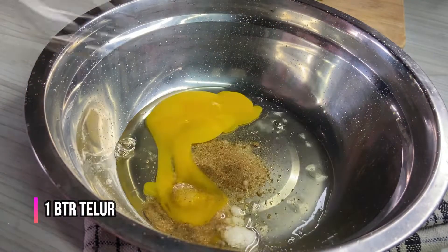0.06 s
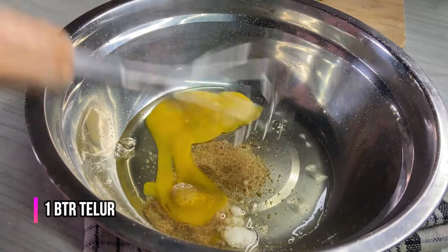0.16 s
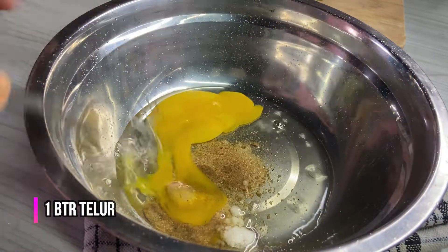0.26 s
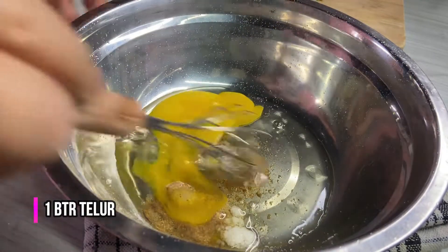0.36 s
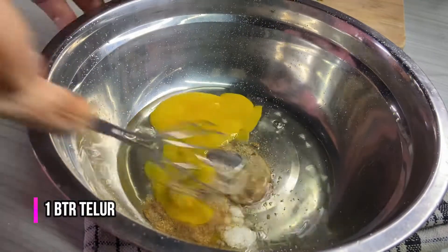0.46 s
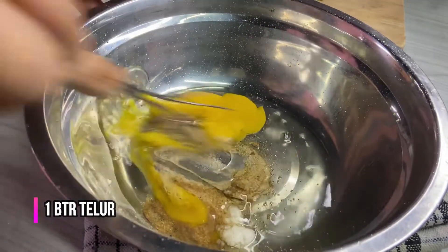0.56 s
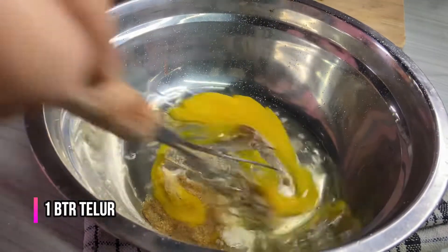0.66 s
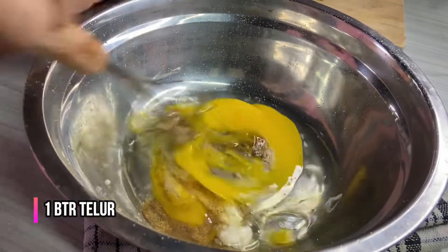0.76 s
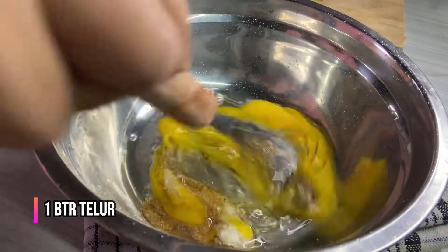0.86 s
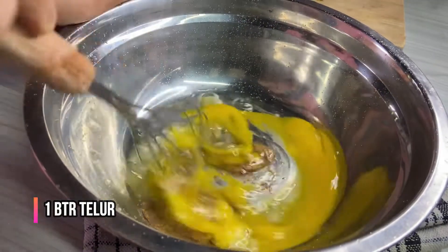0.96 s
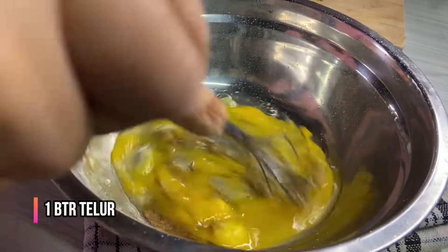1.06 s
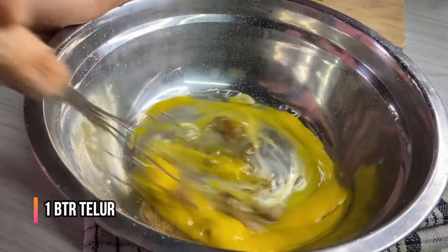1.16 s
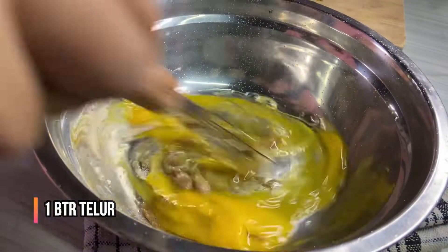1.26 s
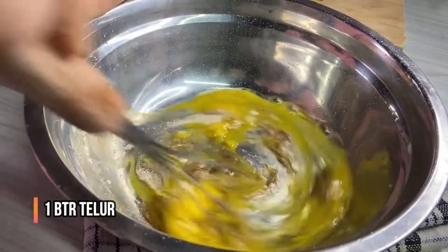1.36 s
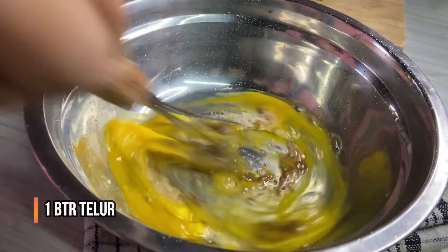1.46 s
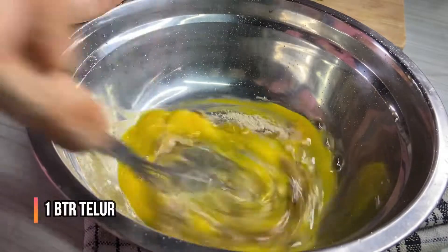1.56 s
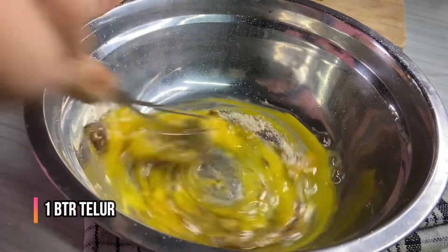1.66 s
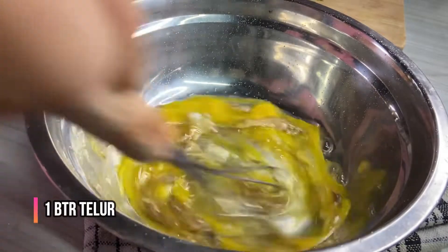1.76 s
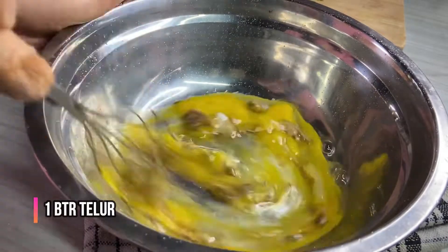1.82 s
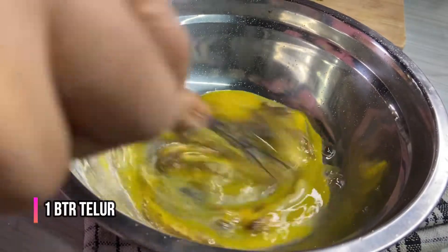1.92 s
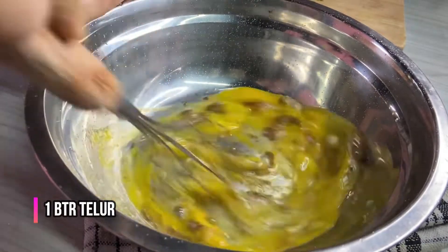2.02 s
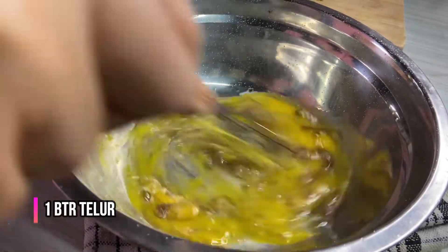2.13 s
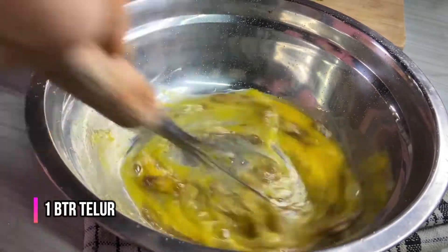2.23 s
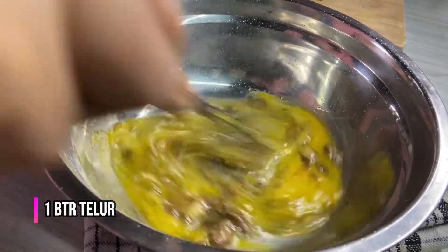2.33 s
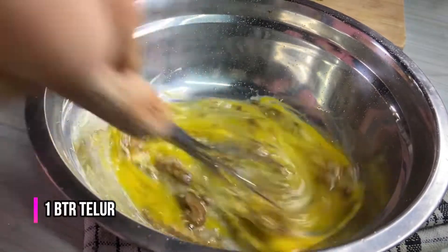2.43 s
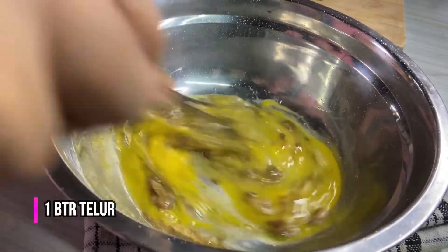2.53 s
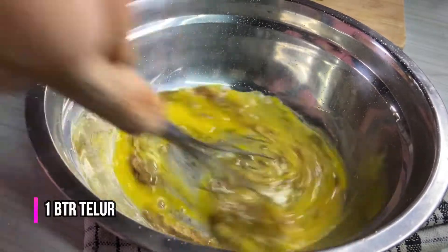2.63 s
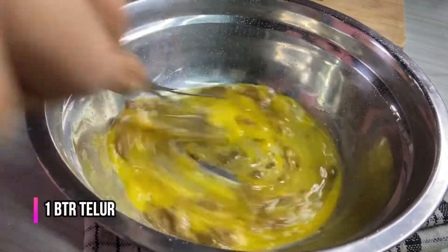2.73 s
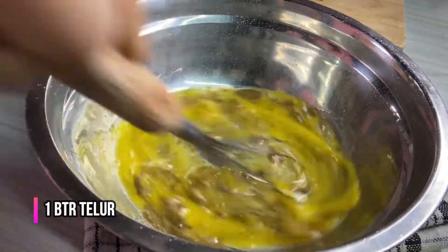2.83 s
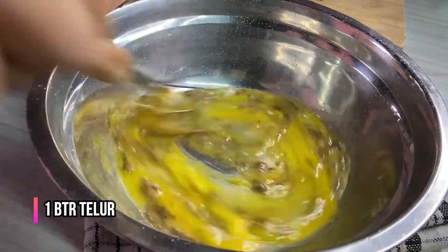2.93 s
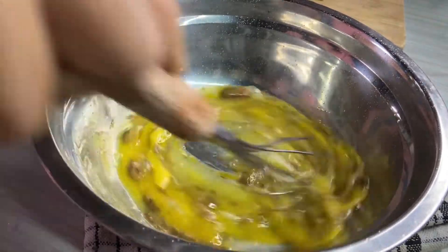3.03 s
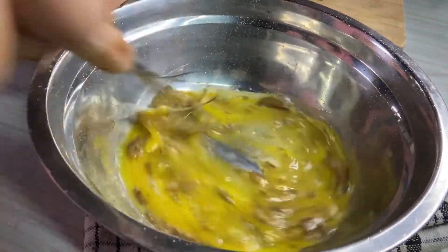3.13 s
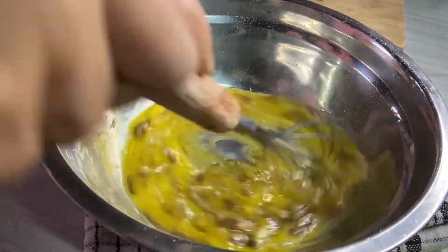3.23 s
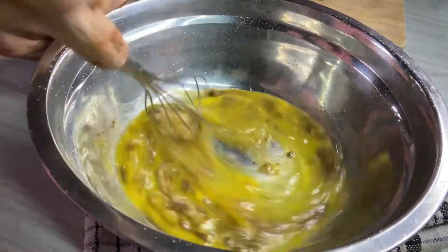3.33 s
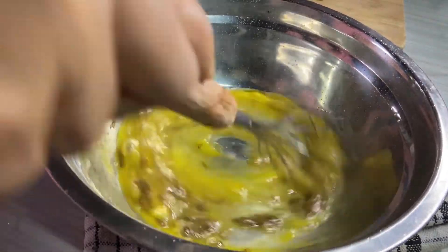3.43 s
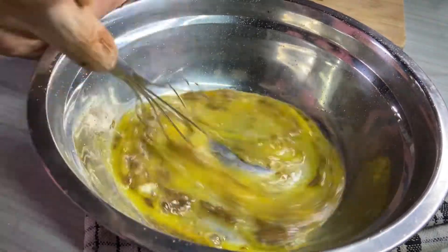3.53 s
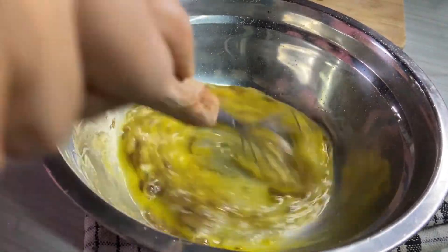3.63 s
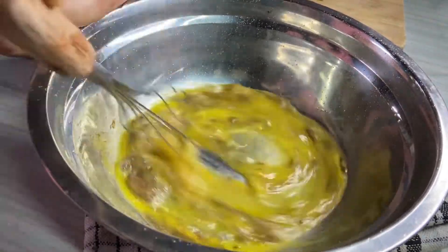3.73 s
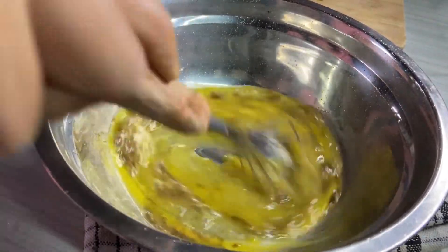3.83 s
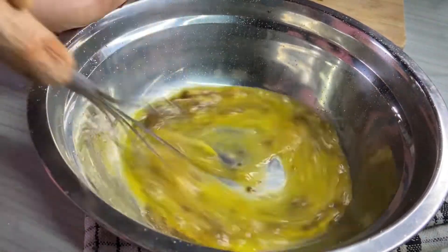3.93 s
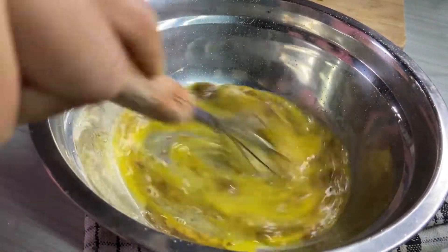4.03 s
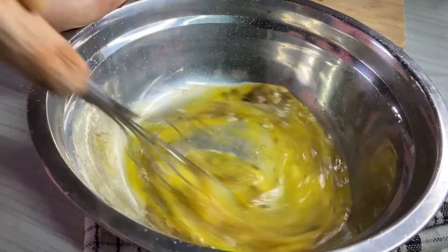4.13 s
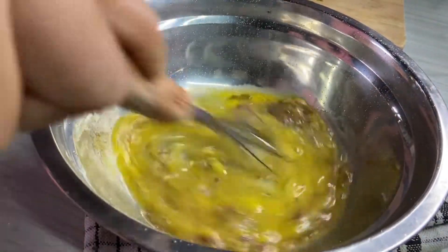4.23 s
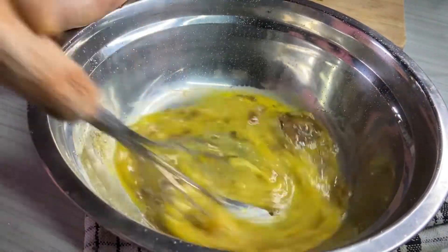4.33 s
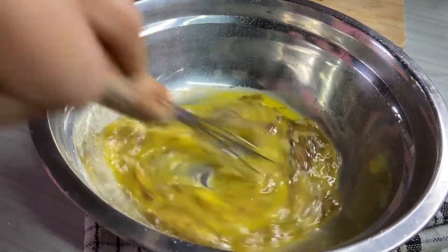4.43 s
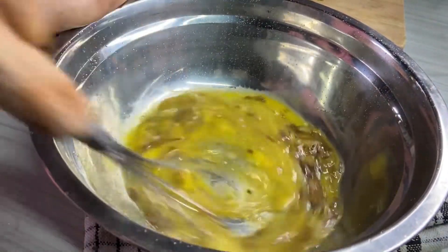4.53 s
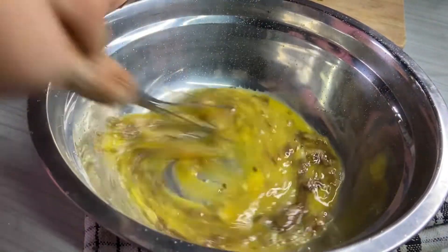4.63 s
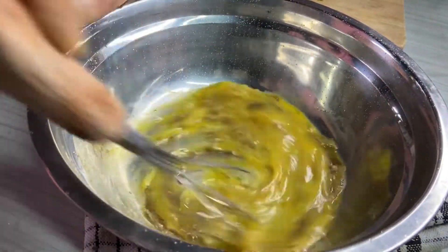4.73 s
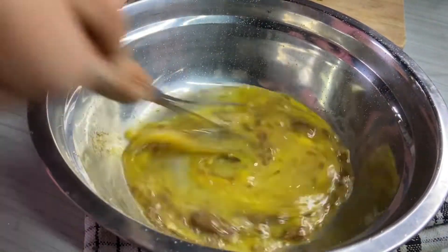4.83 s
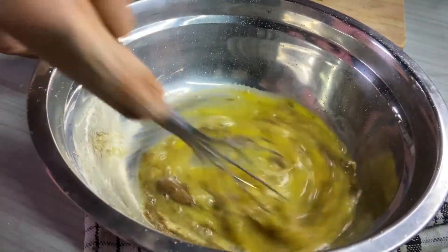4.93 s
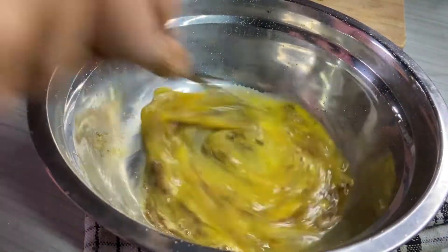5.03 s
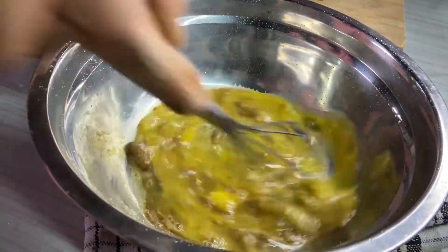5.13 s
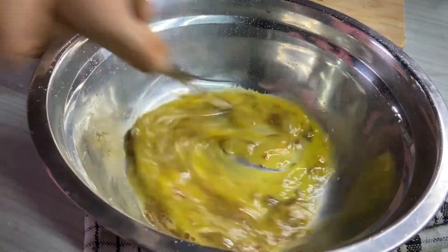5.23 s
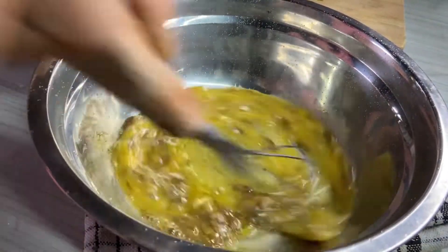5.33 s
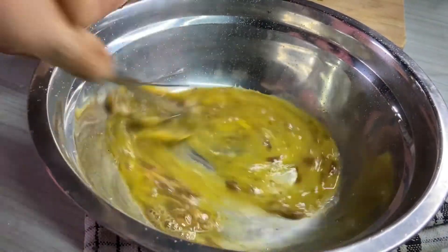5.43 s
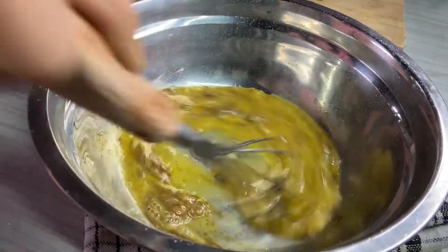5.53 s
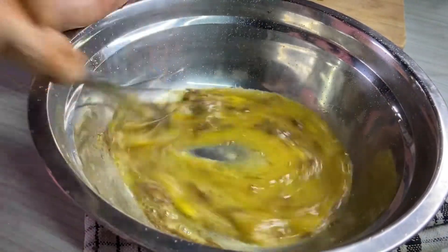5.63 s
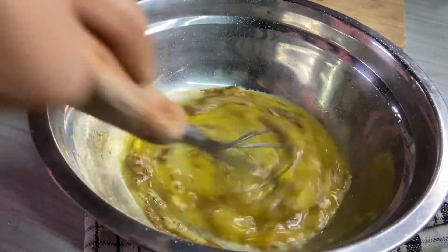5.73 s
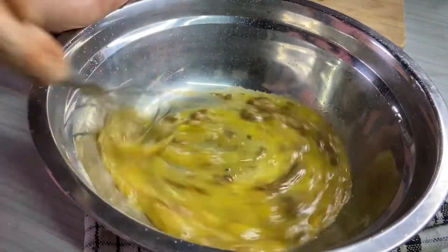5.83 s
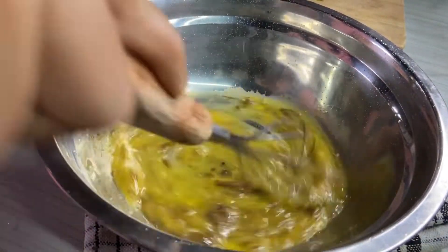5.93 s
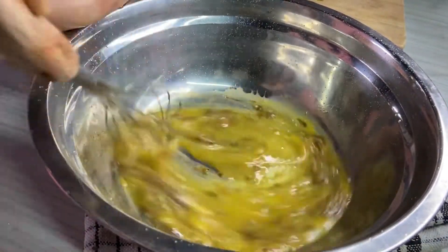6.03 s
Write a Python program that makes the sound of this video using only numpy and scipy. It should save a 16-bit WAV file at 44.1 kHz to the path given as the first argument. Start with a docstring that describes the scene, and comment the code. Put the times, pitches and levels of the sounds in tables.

```python
"""A faint drag of wires and shaking of the table, then a first blow that sets a dry steel wall ringing.
A wire whisk beats an egg with coarse sugar in a steel bowl on a cloth, close to the microphones.
Noise and random clicks make the wires grind sugar and rasp over the steel, stroke by stroke.
Clicks set tuned resonances ringing for the dry wall and for the wet, damped bottom where wires
knock and the whisk head bumps; low noise is the bowl rocking on the table."""
import sys
import numpy as np
from scipy import signal
from scipy.fft import rfft, irfft, next_fast_len
from scipy.io import wavfile

SR = 44100
rng = np.random.default_rng(int(sys.argv[2]) if len(sys.argv) > 2 else 0)


def generate_wav(signal):
    """Clip the signal to [-1, 1] and save it as 16-bit WAV at the path in sys.argv[1]."""
    frames = np.transpose(np.atleast_2d(signal))
    scaled = np.clip(frames, -1, 1) * 32767
    pcm = np.round(scaled).astype(np.int16)
    wavfile.write(sys.argv[1], SR, pcm)


N = 267687   # length of the sound [samples]
STEP = 20   # slow changes are worked out only at every 20th sample
RATTLE = rng.standard_normal(N)   # chatter force of the springy wires


def from_db(db):
    """Turn decibels into a gain."""
    return 10 ** (np.asarray(db) / 20)


def rms_one(x):
    """Scale to an average strength (rms) of 1."""
    return x / np.sqrt(np.mean(x ** 2) + 1e-20)


def clicks_at(times, gains):
    """Silence with a one-sample click of the given size at each time."""
    clicks = np.zeros(N)
    np.add.at(clicks, np.round(np.asarray(times) * SR).astype(int), gains)
    return clicks


def coloured(x, points):
    """Shape the tone of x with a curve of (pitch [Hz], level [dB]) points."""
    size = next_fast_len(N)
    hz = np.arange(size // 2 + 1) * SR / size + 1
    point_hz, point_db = np.transpose(points)
    gain = from_db(np.interp(np.log(hz), np.log(point_hz), point_db))
    return irfft(rfft(x, size) * gain, size)[..., :N]


def flicker(rate_hz, depth_db):
    """A gain that wanders at random, made by smoothing noise."""
    r = np.exp(-2 * np.pi * rate_hz * STEP / SR)
    noise = rng.standard_normal(N // STEP + 3002)
    slow = signal.lfilter([1], [1, -2 * r, r * r], noise)[3000:]   # drop the filter's start-up
    return from_db(depth_db * np.interp(np.arange(N) / STEP, np.arange(len(slow)), rms_one(slow)))


def grains(per_s, spread_db):
    """Random clicks of uneven size, like many tiny contacts, with rms 1."""
    sizes = from_db(spread_db * np.minimum(rng.exponential(1, N), 5))
    signs = rng.choice([-1, 1], N)
    return rms_one(sizes * signs * (rng.random(N) < per_s / SR))


def ring(x, hz, t60):
    """One resonance: a click of size 1 starts a sine of height 1 that fades by 60 dB in t60 seconds."""
    r = from_db(-60 / (t60 * SR))
    w = 2 * np.pi * hz / SR
    return signal.lfilter([0, np.sin(w)], [1, -2 * r * np.cos(w), r * r], x + 1e-18)


def bursts(times, gains, chatter_s, click):
    """Each contact is a click followed by a short rattle of the springy wires."""
    clicks = clicks_at(times, gains)
    fade = signal.lfilter([1], [1, -np.exp(-1 / (chatter_s * SR))], clicks + 1e-18)
    return click * clicks + fade * RATTLE / np.sqrt(chatter_s * SR)


def pan(x, db):
    """Spread over left and right; db is how much stronger the left is."""
    return x * from_db([[db / 2], [-db / 2]])


def patches(clicks, low_hz, high_hz, cycles, patchy_db, count):
    """Deal clicks to short-ringing patches of steel that come and go; rms 1."""
    dealt = rng.integers(0, count, N)
    total = np.zeros(N)
    for k, hz in enumerate(np.geomspace(low_hz, high_hz, count)):
        own_clicks = clicks * (dealt == k) * flicker(12.8, patchy_db)
        total += ring(own_clicks, hz, cycles / hz) * np.sqrt(hz)
    return rms_one(total)


def swells(middle_s, length_s, peak_db):
    """Power of a row of soft swells that fall off like a bell on both sides of their peak."""
    edge_drop_db, late_share = 7, 0.64   # drop at both ends; share of the length after the peak
    power = np.zeros(N // STEP + 1)
    t = np.arange(len(power)) * STEP / SR
    for middle, length, db in zip(middle_s, length_s, peak_db):
        from_peak = t - middle + (late_share - .5) * length
        edge = from_peak / (length * np.where(from_peak > 0, late_share, 1 - late_share))
        power += from_db(2 * (db - edge_drop_db * edge ** 2))
    return np.repeat(power, STEP)[:N]


def fading(times, peak_db, fade_s):
    """Power that jumps up at each time and dies away."""
    jumps = clicks_at(times, from_db(2 * np.asarray(peak_db)))
    return signal.lfilter([1], [1, -np.exp(-2 / (fade_s * SR))], jumps + 1e-18)


def skid(level_db, fade_s):
    """Power of the wires skidding down the dry wall: a quick rise, a steady moment, then a fade."""
    rise_s, hold_s = .006, 0.038   # both counted from the first blow
    t = np.arange(N) / SR - BLOW[0][0]
    rise = np.clip(t / rise_s, 0, 1) ** 2
    return rise * from_db(2 * level_db) * np.exp(-2 * np.maximum(t - hold_s, 0) / fade_s)


# Steady levels before the first blow: (sugar [dB], rasp [dB], bottom rumble [dB], table shake [dB])
BEFORE = (-59, -53.5, -61.5, -59)
SUGAR, RASPING, RUMBLING, SHAKING = range(4)   # places in that row


def over_bed(source, bed_db, power):
    """Level in dB of a steady bed, with its own value before the first blow, plus moving power."""
    waiting = np.arange(N) < BLOW[0][0] * SR
    bed = np.where(waiting, BEFORE[source], bed_db)
    return 10 * np.log10(from_db(2 * bed) + power)


# The bowl lurches on the cloth: (time [s], level [dB])
LURCHES = [(0.13, -55), (0.45, -46), (0.58, -47), (0.71, -64), (1.17, -44), (1.28, -45), (1.37, -48),
           (1.58, -60), (1.81, -43.5), (2.05, -41), (2.28, -44), (2.47, -41), (2.76, -49), (2.92, -46),
           (3.12, -45), (3.32, -46), (3.55, -42), (3.97, -44), (4.12, -50), (4.36, -48), (4.71, -40),
           (5.13, -48), (5.4, -39), (5.65, -47), (5.75, -52), (5.86, -56), (6.07, -43)]
# Tone of the shaking table: (pitch [Hz], level [dB])
SHAKE_TONE = [(20, -37), (32, -19), (52, -1), (85, -6.5), (130, -11.5), (200, -9), (400, -44)]


def rocking():
    """The rocking bowl shakes the table and the microphones on it: low noise that swells with each lurch."""
    s, db = np.transpose(LURCHES)
    level_db = over_bed(SHAKING, -50.5, swells(s, np.full(len(s), 0.071), db))   # each lurch 0.071 s long
    mid, side = coloured(rng.standard_normal((2, N)), SHAKE_TONE)
    shake = rms_one(mid + 0.18 * side * [[1], [-1]])
    return shake * flicker(20, 2.4) * from_db(level_db)


# Sweeps of the wires over the steel: (middle [s], length [s], sugar level [dB], wet rasp level [dB])
STROKES = [(0.176, 0.076, -54, -41), (0.379, 0.026, -30, -29), (0.5, 0.029, -41, -56),
           (0.605, 0.049, -27, -34.5), (0.743, 0.086, -31.5, -57), (0.83, 0.044, -29.5, -62),
           (0.99, 0.047, -38, -66), (1.058, 0.053, -24.5, -41), (1.168, 0.056, -30.5, -33),
           (1.212, 0.023, -22.5, -28), (1.286, 0.064, -26, -41.5), (1.39, 0.102, -31, -50),
           (1.51, 0.045, -30.5, -41.5), (1.547, 0.033, -34.0, -44), (1.658, 0.039, -32.0, -54),
           (1.722, 0.044, -26, -53), (1.81, 0.033, -27, -44), (1.947, 0.073, -26, -44),
           (2.054, 0.065, -25.5, -40), (2.144, 0.039, -24.5, -53), (2.189, 0.012, -28, -26),
           (2.277, 0.061, -31.0, -43), (2.362, 0.039, -25, -45), (2.402, 0.024, -27.5, -29),
           (2.482, 0.052, -27, -51), (2.56, 0.049, -24, -43), (2.685, 0.083, -29.0, -44),
           (2.78, 0.071, -25, -46), (2.883, 0.087, -29.5, -35.5), (2.973, 0.079, -22.5, -33.0),
           (3.113, 0.043, -27.5, -56), (3.199, 0.073, -24, -35.5), (3.32, 0.08, -28.5, -44),
           (3.418, 0.063, -22, -32), (3.53, 0.073, -25, -56), (3.615, 0.05, -22.0, -49),
           (3.73, 0.093, -28.5, -39.5), (3.82, 0.064, -26.0, -35), (3.944, 0.15, -28.5, -36.5),
           (4.036, 0.064, -25.5, -38), (4.165, 0.1, -28, -42), (4.246, 0.057, -25.5, -47),
           (4.353, 0.1, -30, -41), (4.462, 0.096, -27.5, -39.5), (4.588, 0.12, -34, -40.0),
           (4.683, 0.087, -29.5, -35.5), (4.783, 0.11, -34, -36.5), (4.88, 0.081, -30.5, -42),
           (4.991, 0.057, -26.5, -57), (5.08, 0.068, -21, -30), (5.206, 0.1, -27.5, -50),
           (5.306, 0.059, -26, -34), (5.385, 0.047, -25.5, -43), (5.508, 0.12, -30, -35),
           (5.61, 0.093, -30, -34.5), (5.696, 0.071, -28.0, -36.5), (5.84, 0.083, -27, -35.5),
           (5.906, 0.058, -25, -32), (6.026, 0.058, -28.5, -49)]
# Tone of the wet rasp: (pitch [Hz], level [dB])
RASP_TONE = [(250, -66), (600, 0.5), (850, -1), (1140, -7), (1400, 1.5), (2000, 2), (3000, 3.5),
             (4600, 3.5), (5500, -4.5), (7000, 3.5), (9500, -36)]
# Share of the rasp that differs between left and right: (pitch [Hz], level [dB])
RASP_SIDE = [(700, -3), (1500, -6.5), (3000, -19), (5500, 5.5)]


def rasp():
    """Wires dragged through the egg, slipping as they go: noise plus clicks that ring patches of steel."""
    s, length, _, db = np.transpose(STROKES)
    level_db = over_bed(RASPING, -39, swells(s, length, db) + skid(-33, .04))   # bed: a light drag
    rings = patches(grains(5000, 3.74), 846, 5720, 29.4, 6.3, count=12)
    mid = coloured(rings + 1.53 * rng.standard_normal(N), RASP_TONE)
    slips = grains(5100, 3.0) + 1.44 * rng.standard_normal(N)
    side = coloured(coloured(slips, RASP_TONE), RASP_SIDE)
    both = rms_one(mid + side * [[1], [-1]]) * flicker(20.0, 2.0)
    return pan(both * from_db(level_db), 3.5)


# Tone of the crushed sugar: (pitch [Hz], level [dB])
GRIND_TONE = [(1500, -50), (4000, -8.5), (5500, -8.5), (6500, -7.5), (7500, 2.5), (8500, 2), (10000, 1),
              (12500, -3), (15500, -2)]


def grinding():
    """Sugar grains crushed under the wires: dense bright clicks and noise, partly ringing the steel."""
    s, length, db, _ = np.transpose(STROKES)
    level_db = over_bed(SUGAR, -36.5, swells(s, length, db) + skid(-15, 0.02))   # bed: a light drag
    grit = grains(9000, 2.24)
    rings = patches(grit, 5268, 14500, 120.0, 4.9, count=14)
    crunch = rms_one(coloured(grit + 1.1 * rng.standard_normal(N) + 0.71 * rings, GRIND_TONE))
    return crunch * flicker(23.5, 0.88) * flicker(38, 1.88) * from_db(level_db)


# Wires of the first blow landing on the wall: (time [s], strength [dB], strongest pitch [Hz])
BLOW = [(0.2658, -4, 7000), (.2682, -5.5, 7000), (.2715, -4, 3100), (.2745, -6.5, 3060), (0.28, -6, 1500),
        (.283, -20, 3020), (.288, -15, 740), (.302, -12, 4800), (.307, -20, 7000), (.377, -31, 1390)]
# Wires knocking on the bottom: (time [s], strength [dB], strongest pitch [Hz], tick strength [dB])
KNOCKS = [(0.529, -21, 770, -29), (0.574, -29, 810, -29), (0.733, -22, 2650, -39), (0.816, -14, 1360, -45),
          (0.903, -26, 4400, -41), (1.097, -20.5, 2700, -25), (1.116, -32, 4630, -21),
          (1.147, -16, 1360, -25), (1.196, -13.5, 905, -36), (1.246, -18, 940, -31.5),
          (1.315, -20, 1570, -33), (1.333, -13.5, 1360, -18), (1.372, -27, 2260, -31),
          (1.687, -22.5, 1330, -37), (1.708, -32, 4270, -31), (1.772, -18, 2730, -22),
          (1.805, -18, 1140, -32), (1.866, -22.5, 2570, -20), (1.902, -18, 4040, -33),
          (1.982, -13, 2240, -32), (1.995, -17.5, 1360, -39), (2.021, -13, 990, -28),
          (2.056, -31, 4470, -18), (2.136, -28, 4570, -28), (2.169, -24, 3020, -29),
          (2.196, -15.5, 4900, -21), (2.245, -12.5, 1150, -21), (2.386, -23, 750, -29),
          (2.399, -15, 1980, -27), (2.409, -14.5, 1520, -32), (2.453, -15, 1280, -23),
          (2.631, -23, 4680, -19), (2.743, -22, 4960, -28), (2.835, -12, 1570, -34),
          (2.856, -15, 1560, -29), (2.893, -15.5, 4520, -14), (2.922, -14, 915, -14),
          (2.948, -10, 4930, -18), (3.074, -20, 4380, -24), (3.147, -15, 930, -10),
          (3.399, -21.5, 4920, -13), (3.439, -20, 3100, -30), (3.467, -12, 2270, -27),
          (3.497, -24, 1340, -19), (3.603, -23, 3940, -29), (3.679, -20.5, 2300, -23),
          (3.761, -20, 820, -15.5), (3.885, -20, 2660, -31), (3.904, -18.5, 1480, -24),
          (3.962, -34, 1970, -14), (3.963, -12, 1010, -22), (4.006, -19, 818, -21), (4.067, -16, 4400, -24),
          (4.121, -14.5, 2180, -25), (4.176, -17, 780, -14), (4.276, -20, 4380, -32),
          (4.331, -20, 1280, -32), (4.509, -22, 1530, -34), (4.565, -17.5, 1130, -35),
          (4.797, -25, 1980, -27), (4.947, -17.5, 1550, -22), (4.999, -37, 4900, -20),
          (5.038, -16, 1360, -13), (5.076, -18, 826, -15), (5.112, -17.5, 1530, -22),
          (5.16, -23.5, 1360, -30), (5.237, -25.5, 1360, -31), (5.3, -27, 1540, -19),
          (5.315, -12, 3350, -21), (5.333, -18.5, 1360, -27), (5.374, -13, 1460, -34),
          (5.628, -12.5, 915, -34), (5.68, -11.5, 810, -11.5), (5.825, -17.5, 1510, -16),
          (5.89, -16.5, 770, -25), (6.048, -15.5, 1000, -34)]
# Resonances of the dry wall: (pitch [Hz], strength [dB], time to fade by 60 dB [s])
WALL = [(733, -9, 1.3), (1044, -20, .5), (1373, -13, .9), (1443, -5, .68), (1502, -4, .58), (1588, -13, .6),
        (2024, -21, .6), (2455, -14, .75), (2803, -14, .8), (3170, -6, .2), (2891, -8, .73),
        (2932, -4, .54), (3101, 2, .2), (3239, -5, .8), (3375, -13, .3), (3623, -20, .5), (3978, -15, .4),
        (4382, -5, .33), (4797, -13, .4), (4587, -19, .5), (5518, -16, .42), (5787, -17, .36),
        (6272, -9, .17), (6462, -7, .2), (6654, -10, .22), (6966, -8, .24), (7118, -7, .2), (7294, -8, .2),
        (7590, -7, .18), (7854, -9, .18), (8420, -7, .18), (8672, -8, .18), (8832, -8, .18)]


def wall():
    """Each wire of the first blow, and faintly each knock, rings the wall, most near its own pitch."""
    s, db, pitch_hz = np.r_[np.array(BLOW), np.array(KNOCKS)[:, :3]].T
    db = db - 25 * (np.arange(len(s)) >= len(BLOW))   # knocks reach the wall only faintly
    out = np.zeros((2, N))
    for k, (hz, mode_db, t60) in enumerate(WALL):
        near_db = -10.5 * np.minimum(np.abs(np.log2(hz / pitch_hz)), 1.5)
        uneven_db = rng.standard_normal(len(s))
        clicks = np.zeros(N)
        clicks[np.round(s * SR).astype(int)] = from_db(db + mode_db + near_db - 15 + uneven_db)
        side_db = 3 + 3 * rng.standard_normal()   # each resonance beams its own way
        out += pan(ring(clicks, hz, t60), side_db) * (-1) ** k
    return out


# A wire springs against bare steel: (time [s], strength [dB])
SNAPS = [(1.7715, -12), (2.196, 11), (2.1985, 17), (2.948, 6), (2.9495, 12), (3.4685, -12), (5.038, -5)]
# Tone of the bright spit: (pitch [Hz], level [dB])
SPIT_TONE = [(1500, -68), (3500, -13), (5000, -1.5), (8000, -6.5), (12000, -28), (16000, -21)]
# Tone of a snap: (pitch [Hz], level [dB])
SNAP_TONE = [(2000, -40), (4800, -9), (7500, -10), (9500, -14), (12000, -12), (15000, -2)]
# Tone of the dry crack: (pitch [Hz], level [dB])
CRACK_TONE = [(200, -50), (700, 5), (1500, -10), (3000, -2.5), (5500, -9.5), (9000, -9)]


def ticks():
    """Bare steel on steel: a dry crack and a short bright spit at each contact; snaps rattle shortest."""
    blow, knocks = np.array(BLOW), np.array(KNOCKS)
    s = np.r_[blow[:, 0], knocks[:, 0]]
    spit_db = np.r_[blow[:, 1] + 14, knocks[:, 3] + 21]
    crack_db = np.r_[blow[:, 1] + 6, knocks[:, 1] + 14]
    snap_s, snap_db = np.transpose(SNAPS)
    spit = coloured(bursts(s, from_db(spit_db), 0.0038, click=0.12), SPIT_TONE)
    crack = coloured(bursts(s, from_db(crack_db), 0.00089, click=0.1), CRACK_TONE)
    snap = coloured(bursts(snap_s, from_db(snap_db), .0004, click=0.49), SNAP_TONE)
    return spit + snap + pan(crack, 3.9)


def strike(events, hz, trim_db, narrow_db, chatter_s, click):
    """What a table of contacts feeds into one resonance: the spot struck favours one pitch."""
    s, strength_db, pitch_hz = np.transpose(events)[:3]
    near_db = -narrow_db * np.minimum(np.abs(np.log2(hz / pitch_hz)), .6)
    uneven_db = 3.3 * rng.standard_normal(len(s))
    return bursts(s, from_db(strength_db + trim_db + near_db + uneven_db), chatter_s, click)


# Whisk head bumping the bottom: (time [s], strength [dB], strongest pitch [Hz])
THUDS = [(0.367, -22, 910), (0.53, -23.5, 776), (0.57, -25, 440), (0.684, -29, 920), (1.099, -25.5, 274),
         (1.207, -18, 719), (1.254, -16.5, 290), (1.539, -25, 200), (1.688, -30.5, 525),
         (1.755, -26.5, 293), (1.91, -18, 273), (1.981, -27, 363), (2.026, -32, 934), (2.183, -19, 377),
         (2.237, -23, 334), (2.386, -19, 770), (2.455, -25.5, 530), (2.714, -31.5, 191),
         (2.742, -27.5, 253), (2.812, -22, 430), (2.913, -26, 213), (2.923, -15, 256), (3.028, -29.5, 172),
         (3.031, -20, 426), (3.074, -33, 530), (3.143, -24.5, 530), (3.188, -23.5, 304),
         (3.236, -18.5, 320), (3.296, -26.5, 404), (3.363, -23, 280), (3.464, -23.5, 296),
         (3.499, -25, 298), (3.565, -22, 285), (3.766, -18.5, 291), (3.864, -18, 308), (3.909, -21, 207),
         (3.963, -17.5, 275), (4.007, -18.5, 506), (4.084, -21, 277), (4.124, -26, 536),
         (4.181, -14.5, 274), (4.224, -27.5, 435), (4.288, -19, 330), (4.498, -23.5, 317),
         (4.635, -20.5, 346), (4.727, -22.5, 256), (5.036, -25.5, 850), (5.078, -22.5, 296),
         (5.159, -24, 275), (5.312, -18.5, 324), (5.373, -21, 207), (5.433, -14, 266), (5.633, -15.5, 260),
         (5.683, -19, 292), (5.833, -15.5, 255), (5.895, -17.5, 272), (6.051, -17.5, 297)]
# Curve of the patter of small contacts on the bottom: (time [s], level [dB])
RUMBLE = [(0.3, -45), (0.44, -48), (0.78, -52), (1.94, -42), (2.18, -51.5), (2.69, -44), (2.94, -40.5),
          (3.39, -44.5), (3.63, -46), (4.12, -41), (4.33, -46.5), (5.47, -42.5), (5.96, -50), (6.07, -45)]
# Resonances of the wet bottom on the cloth:
# (pitch [Hz], strength [dB], time to fade by 60 dB [s], left over right [dB])
BOTTOM = [(190.5, -7, 0.098, -8.5), (273.5, 5.5, 0.039, 2.5), (349, 6, 0.027, 6), (414.5, 3, 0.053, 2),
          (530, 9.5, 0.029, 0.5), (740, -1, 0.033, 7.5), (915, 0.5, 0.046, 3), (1055, 6, 0.0081, 6.5),
          (1360, 8.5, 0.023, 3.5), (1538, -1, 0.043, 3), (2040, 12, 0.012, 0), (2670, 5, 0.017, 7.5),
          (3210, 3, 0.02, -6), (4420, 6, 0.014, 6), (4930, -7.5, 0.031, 24.5)]


def bottom():
    """Knocks, thuds and a patter of small contacts ring the damped bottom, which fades quickly."""
    bump_s, bump_db = np.transpose(THUDS)[:2]
    stirred = fading(bump_s, bump_db - 15, 0.032)   # each bump stirs up more small contacts
    bed_db = np.interp(np.arange(N) / SR, *np.transpose(RUMBLE))
    patter = grains(500, 4.64) * flicker(13.2, 3.54) * from_db(over_bed(RUMBLING, bed_db, stirred))
    out = np.zeros((2, N))
    for k, (hz, mode_db, t60, pan_db) in enumerate(BOTTOM):
        hits = patter * from_db(-29 - 5.0 * np.log2(hz / 300))
        if hz > 650:   # knocks ring only the higher resonances
            hits = hits + strike(KNOCKS, hz, -10.5, 20.0, 0.004, click=0.64)
        if hz < 1000:   # thuds ring only the lower ones
            hits = hits + strike(THUDS, hz, -6.0, 13.7, 0.016, click=0.35)
        out += pan(from_db(mode_db) * ring(hits, hz, t60), pan_db) * (-1) ** k
    return signal.sosfilt(signal.butter(4, 165, "high", fs=SR, output="sos"), out)


def room(x):
    """A short blurred tail of fading noise, different at each microphone."""
    t60_s, level_db = 0.087, -10
    t = np.arange(SR // 2) / SR
    tail = rng.standard_normal((2, len(t))) * from_db(-60 * t / t60_s) * (t > .004)
    tail /= np.sqrt(np.sum(tail ** 2, axis=1, keepdims=True))
    return from_db(level_db) * signal.fftconvolve(x[None], tail, axes=1)[:, :N]


def scene():
    """Add up bowl, whisk, room and table."""
    bowl = rasp() + grinding() + wall() + ticks() + bottom()
    return bowl + room(bowl.mean(axis=0)) + rocking()


# How far the left leads the right, used below the shared treble: (pitch [Hz], phase [radians])
LEFT_LEAD = [(120, 0.2), (260, 0.24), (2300, 0.89), (4600, 0.055)]


def record(dry):
    """Lows differ in phase; above split_hz both sides carry one treble, delayed on the left
    above aligned_hz; peaks clip, the top is cut."""
    split_hz, aligned_hz, lag_samples = 6300, 6950, 10.5
    size = next_fast_len(N)
    hz = np.arange(size // 2 + 1) * SR / size + 1
    left, right = rfft(dry, size)
    treble = (left + right) / 2
    delay = np.exp(-2j * np.pi * np.maximum(hz - aligned_hz, 0) * lag_samples / SR)
    lead_hz, lead_phase = np.transpose(LEFT_LEAD)
    lead = np.exp(1j * np.interp(np.log(hz), np.log(lead_hz), lead_phase))
    high = hz > split_hz
    both = [np.where(high, treble * delay, left * lead), np.where(high, treble, right)]
    clipped = np.clip(irfft(both, size)[:, :N], -1, 1)
    return signal.sosfilt(signal.ellip(14, .5, 80, 15750, fs=SR, output="sos"), clipped)


dry = scene()
out = record(dry)
generate_wav(out)
```